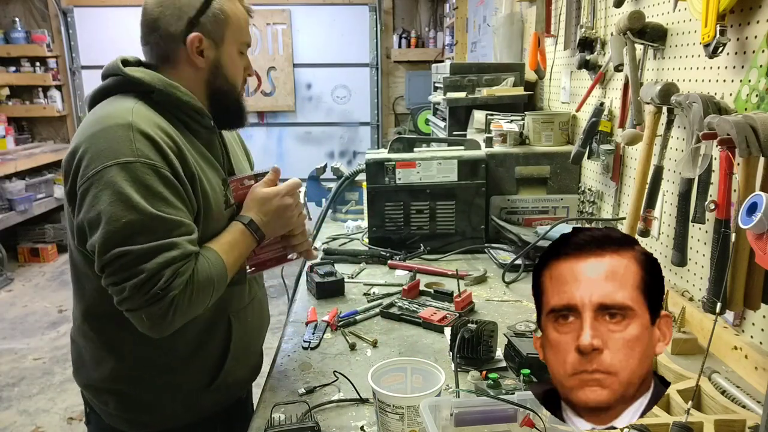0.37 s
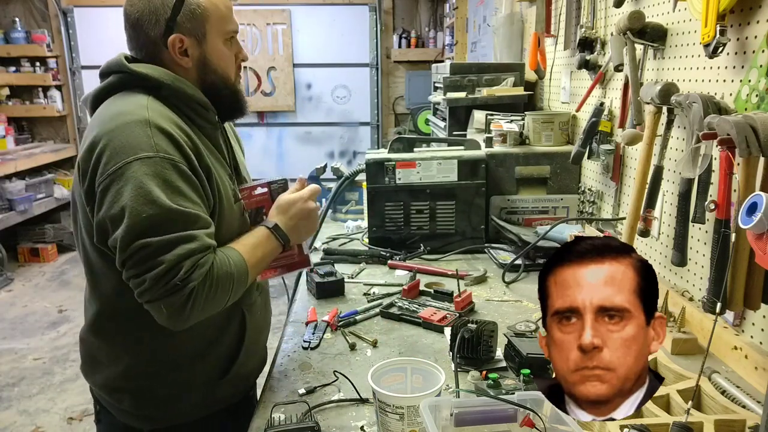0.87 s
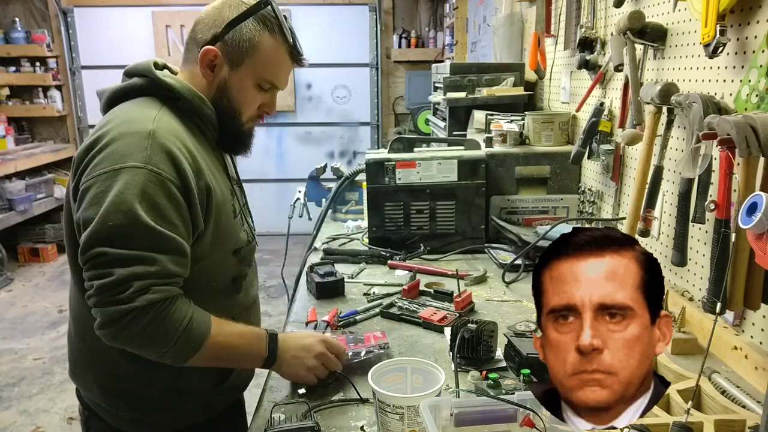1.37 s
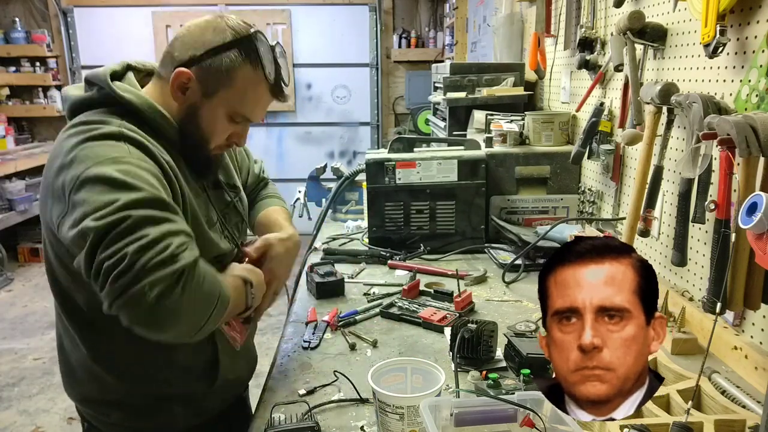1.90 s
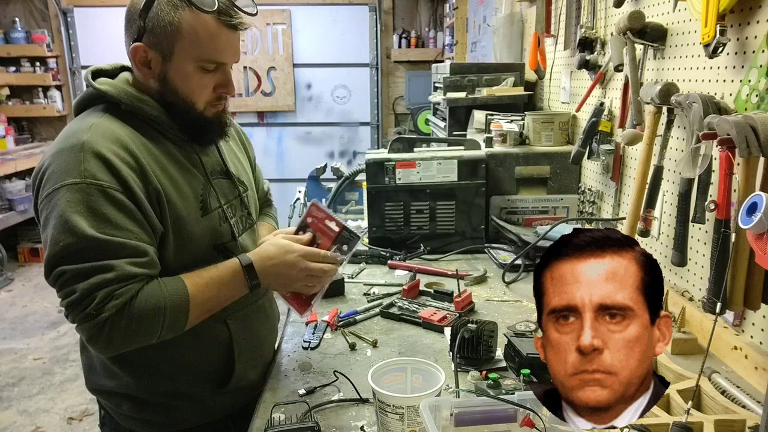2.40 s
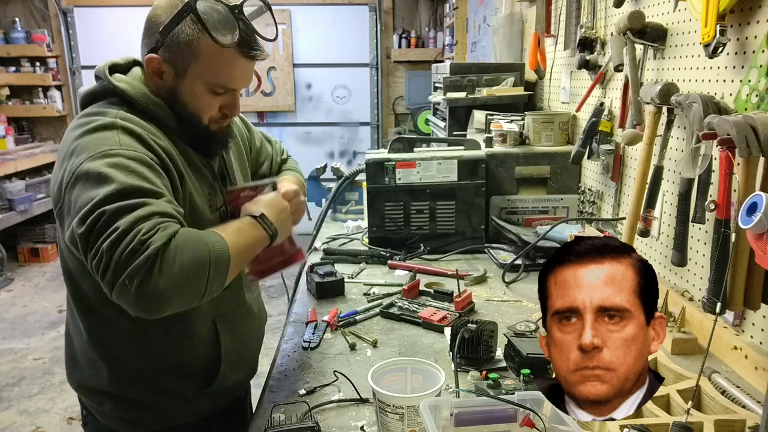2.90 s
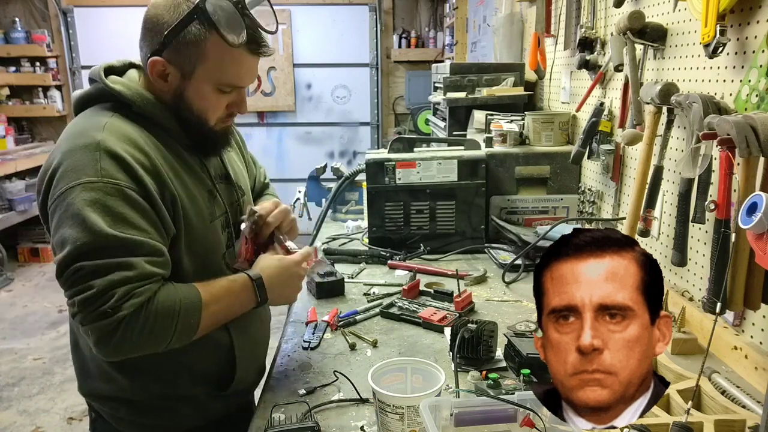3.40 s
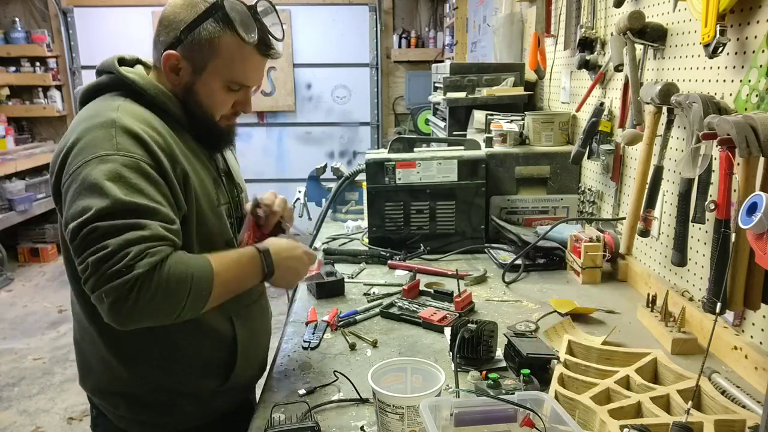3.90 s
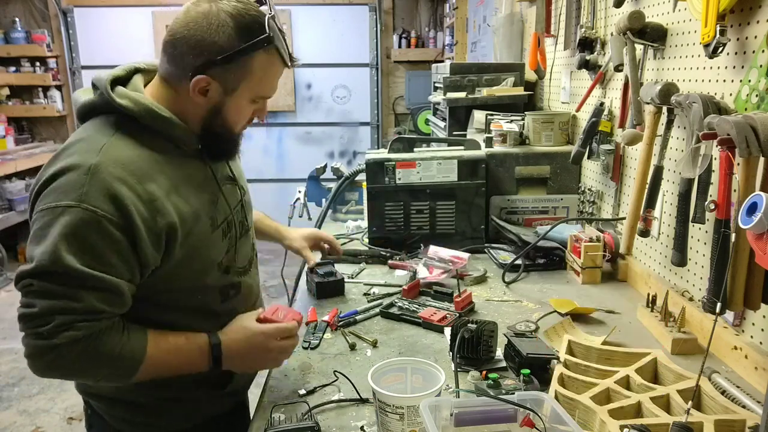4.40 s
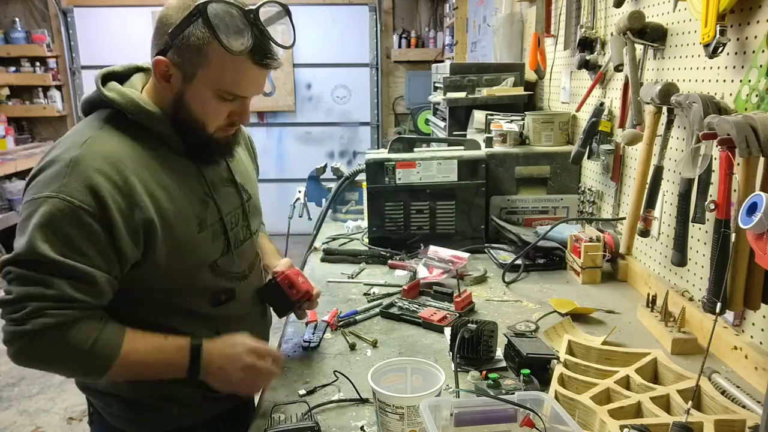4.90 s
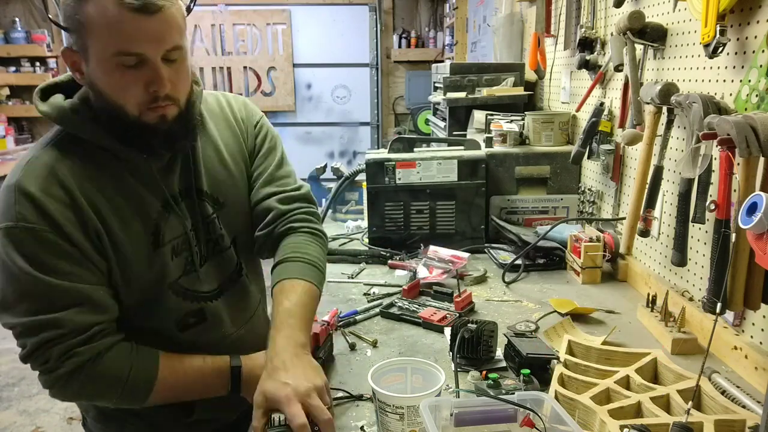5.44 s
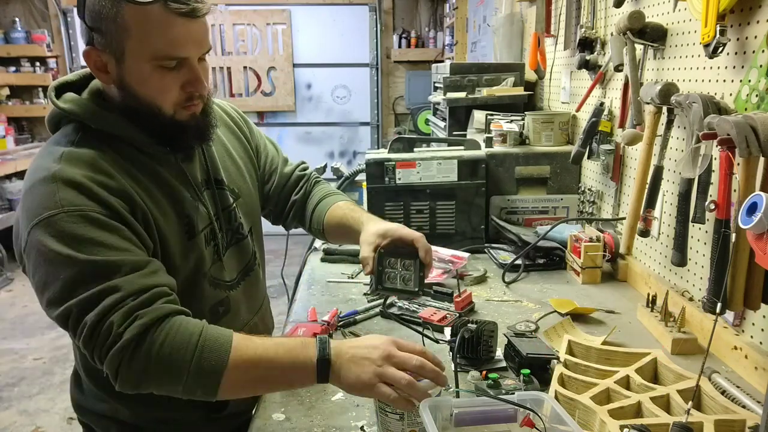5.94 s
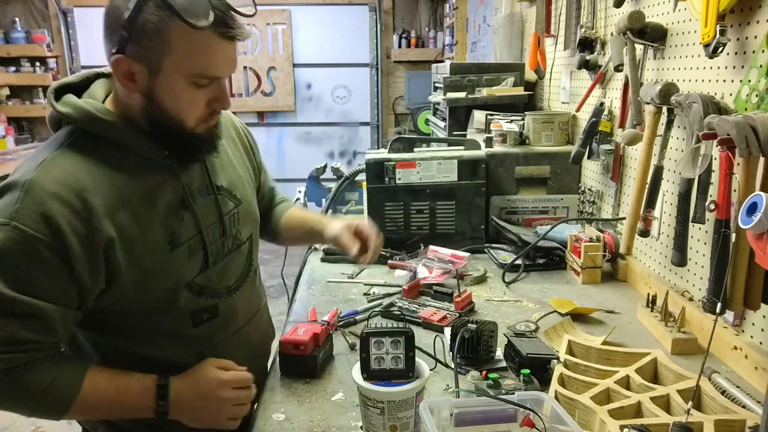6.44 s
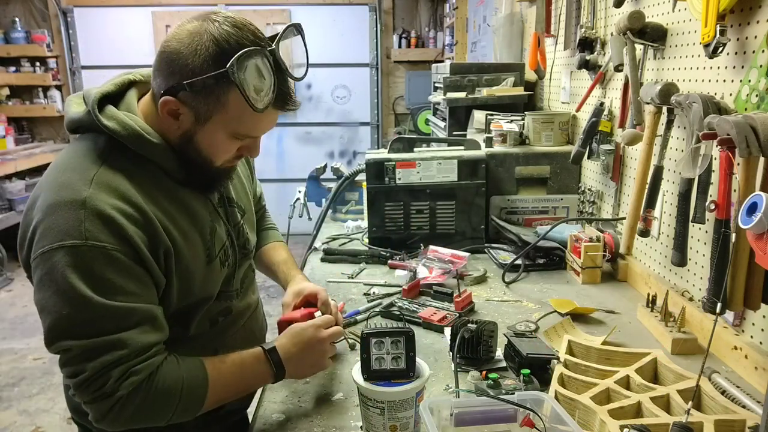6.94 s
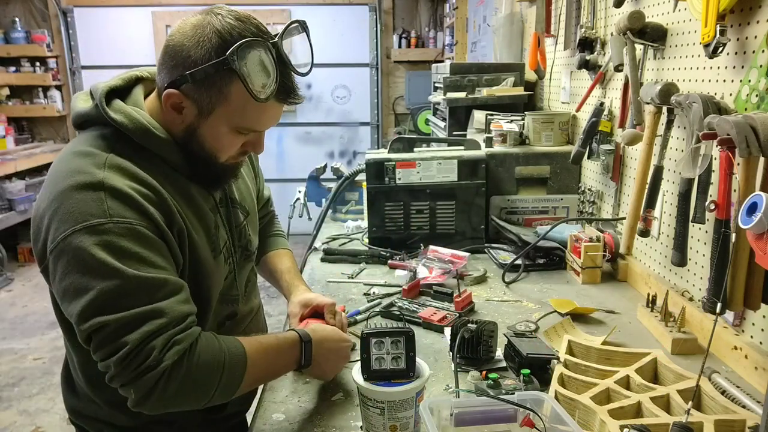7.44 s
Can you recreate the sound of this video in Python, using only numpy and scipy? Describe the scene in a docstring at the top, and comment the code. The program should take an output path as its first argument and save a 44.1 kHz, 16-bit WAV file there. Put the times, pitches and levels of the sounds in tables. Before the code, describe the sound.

A low soft blower rumble, gently fluttering, and faint hiss run throughout a workshop, picked up close by a phone in stereo. From 0 s stiff plastic rustles and ticks in hands, with a hard bright snap at about 0.55 s followed by a short drag. Light irregular crackling continues to 2 s. At 2.15 s a strong crack lands with a dull bench knock; more snaps follow around 2.7 s. Between 3.0 and 3.3 s the tearing peaks: dense hard cracks, hollow short rings, scraping and a knock. Crackle thins through 3.4-4.3 s with several bench taps and a scrape at 4.0. Quiet follows, then clicks at 4.8 and a sharp crack with knock at 4.9. Knocks come at 5.2; after a gap, taps and bright plastic scraping gather around 6.2. Only faint clicks and soft knocks remain near 6.7 and 7.1, ending in blower and hiss.

```python
"""Hands bend and tear a stiff plastic pack over a workbench near a two-port phone; blower and hiss run throughout.
From the start, buckles crack in short noise bursts that ring the pack, over a rustle of slips and brighter drags.
From 2 s, small parts also knock the bench, in decaying sines; cracks and short narrow-band rings crowd at about 3 s.
After 5 s quieter gaps alternate with knocks, and cracks and drags gather again at about 6.2 s.
Each near sound has a short dense noisy tail, cut off early, unlike at the two ports."""
import sys
import numpy as np
from scipy import signal
from scipy.fft import rfft, irfft, next_fast_len
from scipy.io import wavfile
from scipy.ndimage import uniform_filter1d

SR = 44100
rng = np.random.default_rng(int(sys.argv[2]) if len(sys.argv) > 2 else 0)


def unload_audio(sound):
    """Save the sound as a 16-bit wav file, at the path given as the first command line argument."""
    columns = np.transpose(np.atleast_2d(sound))
    # keep every value between -1 and 1, then stretch to whole-number steps
    steps = np.round(np.clip(columns, -1, 1) * 32767)
    wavfile.write(sys.argv[1], SR, steps.astype(np.int16))


def convert_level_to_amplitude(level_db):
    """Map a level in decibels to its linear amplitude factor."""
    exponent = np.asarray(level_db, float) / 20
    return 10 ** exponent


N = 333837
SHORT_SAMPLES = 2048  # length of one crack, noisy ring or knock

# clear cracks of pack and parts: (time [s], mid-band energy as rms over 1 ms [dB], crease ring [Hz],
# low tilt [dB], treble tilt [dB])
CRACKS = [(0.136, -53, 10900, 1, -1.5), (.193, -49, 2370, 4, -16), (0.3013, -36.5, 3760, 7.5, 0.5),
          (0.341, -46.5, 1230, 2, -12.5), (.4633, -46.5, 2450, 4, -6), (0.5198, -55, 9900, -5, -3),
          (0.5292, -51, 10900, -5, -1.5), (.551, -17, 4000, -8, -0.5), (0.608, -40.5, 2930, -12, -1),
          (0.6173, -42.5, 9150, 1, -6.5), (.7162, -48.5, 8800, -23, 1.5), (.777, -63, 10750, -7, 6),
          (0.8238, -42.5, 1765, 2.5, -3.5), (.836, -53, 9100, 4, -3), (0.8953, -46.5, 3770, 4, 5.5),
          (.938, -45.5, 1290, 11, -34), (0.9593, -50, 1370, 9, -18), (.986, -41, 6290, 0.5, -4),
          (1.022, -50, 4670, -19, 1), (1.0638, -58.5, 5020, -8, 8), (1.1, -56.5, 1700, 14, -17),
          (1.1761, -57.5, 1180, 5, -7), (1.259, -66, 8550, -11, 0), (1.281, -47, 8300, -3, 3.5),
          (1.312, -42.5, 4700, -2, 1), (1.5681, -37, 5450, 6, -3.5), (1.5947, -44.5, 1800, 5, -1.5),
          (1.682, -43.5, 5250, 2.5, 1), (1.8212, -45.5, 1380, 13, -10.5), (1.8499, -41, 2000, 8.5, -12.5),
          (1.936, -48, 9600, 3, 4), (1.997, -50.5, 4630, -20, -4), (2.0848, -41, 730, 6.5, -2),
          (2.0958, -56, 1330, 15, -7), (2.1466, -21.5, 3150, 1, -2.5), (2.1918, -41, 9800, 4.5, -1.5),
          (2.2724, -32, 10100, -3, 0), (2.3492, -40.5, 11200, 9.5, 2.5), (2.368, -35.5, 3580, -2.5, -5),
          (2.391, -50.5, 2390, 4, -6), (2.4006, -46.5, 5120, -5, -1), (2.4106, -49.5, 2450, -2, -4),
          (2.594, -46.5, 10160, -15, -2), (2.6113, -50.5, 9500, -12, 6), (2.6199, -51, 8400, -12, 4),
          (2.6524, -48.5, 6400, 3, 0), (2.662, -28, 4150, -3, -4.5), (2.689, -53, 5000, 0, 3),
          (2.7337, -32.5, 4000, -7, 7), (2.7658, -38.5, 4500, 7, -2), (2.77, -25, 4480, 4.5, -8.5),
          (2.8099, -57, 9370, -5, 4.5), (2.8225, -38.5, 5270, 4, -7.5), (2.8575, -46.5, 3580, 5, -6.5),
          (2.9477, -49, 8910, 5, 2.5), (2.999, -53, 5230, -1, -4.5), (3.014, -47, 4180, -2, -1),
          (3.0223, -45.5, 8850, 11, 3.5), (3.0366, -25.5, 3060, -4.5, 4), (3.0394, -23, 1356, -11, 4),
          (3.0511, -17.5, 1340, -21, 2.5), (3.0876, -35, 5600, 5, -4), (3.094, -19, 5400, -3.5, 2.5),
          (3.119, -32, 10440, -7, 5.5), (3.133, -34, 2690, -4, -4), (3.142, -44, 1380, 16, 0),
          (3.149, -39.5, 8460, 15, 6), (3.1575, -26, 1100, -3, -15.5), (3.1668, -15, 1350, .5, -2.5),
          (3.1733, -22, 3000, 7, -3), (3.1773, -16, 5390, 1.5, 1), (3.2148, -21.5, 6955, 2, 2.5),
          (3.2246, -39, 8760, -6, -0.5), (3.27, -32.5, 4510, 4.5, -3.5), (3.304, -45.5, 1335, 13, -7),
          (3.323, -36.5, 1270, 12, -12), (3.3311, -33.5, 1310, -14, -8.5), (3.342, -46, 1335, 13, -4),
          (3.3685, -38, 1356, 5, 2), (3.3869, -39, 7900, -2, 1), (3.4324, -31.5, 790, 4, -14.5),
          (3.4432, -34, 9800, -17, -4.5), (3.532, -47, 1485, -0.5, 2.5), (3.629, -52, 2300, 5, -9.5),
          (3.7761, -42, 5240, -28, -4.5), (3.794, -50.5, 8800, 1, -1), (3.822, -46.5, 742, 11, -0.5),
          (3.9174, -39, 4260, 5, -4), (3.954, -39, 1380, 10, -1), (3.9936, -39, 745, 9.5, -4),
          (4.0111, -24.5, 2320, 3.5, -1.5), (4.0802, -53.5, 1290, 10, -6), (4.087, -44, 1310, 16.5, 5),
          (4.0941, -47, 7950, 6, 2), (4.2071, -52, 1400, 4, -10), (4.2635, -43.5, 1420, 6, -1),
          (4.74, -60.5, 1370, 16, -8), (4.7697, -54, 1335, 9, -11), (4.8206, -35.5, 1350, -4, -4.5),
          (4.8289, -32, 2190, 0.5, -6.5), (4.9085, -16.5, 4170, -10, 3), (5.2057, -52.5, 748, 14, -4.5),
          (5.2323, -52.5, 5000, 3, -2), (5.239, -36.5, 2346, 5, -7.5), (5.8399, -45, 5350, 5.5, -4),
          (5.884, -59, 11100, -6, 11.5), (5.9112, -53.5, 8200, 5, 3), (6.0134, -44, 730, 8, -6.5),
          (6.051, -48, 760, 4, -4.5), (6.1176, -47.5, 4480, 3, -1.5), (6.1678, -45, 10100, 2, 11.5),
          (6.2002, -31.5, 10160, 4.5, -0.5), (6.235, -30, 4100, 11.5, 4), (6.264, -59.5, 9450, 17, 11),
          (6.303, -57, 750, 3, 7), (6.3518, -55, 9150, 12, 6), (6.672, -50, 2280, 5.5, -4),
          (6.7258, -54.5, 10800, 5, 3), (7.0602, -58.5, 1320, 15, -2), (7.0746, -59, 820, 19, 5),
          (7.1142, -62.5, 1390, 17, -9), (7.1225, -62.5, 753, 26, -10)]
# band in which crack energy is counted: (low edge [Hz], high edge [Hz])
CRACK_BAND_HZ = (1800, 5500)
# pack resonances: (centre [Hz], width [Hz], gain [dB])
PACK_MODES = [(1350, 280, 6), (2300, 500, -3), (5500, 600, -6)]
# time scale of a crack: longer when weaker than -10.5 dB, longer when ringing above 3 kHz
SNAP_MS, MS_PER_DB_WEAKER, MS_PER_OCTAVE = 1.9, .008, .25
# random faint crackle; its energy is relative to the handling level, every try sounds at BUSY_DB
CRACKLE_PER_S, CRACKLE_DB, CRACKLE_SPREAD_DB, BUSY_DB = 30, 9, 2.5, -66
CRACKLE_TILT_SPREAD_DB, CRACKLE_MS = 5, 3

# how hard the fingers work the plastic: (time [s], level [dB])
HANDLING = [(0, -72), (.45, -69.5), (.62, -74.5), (1.3, -67), (1.5, -77.5), (2.3, -72), (2.55, -74),
            (3.05, -66.5), (3.21, -57), (3.44, -63), (3.56, -71), (3.95, -78), (4.06, -65.5), (4.15, -73),
            (4.3, -67.5), (4.42, -92), (4.72, -87), (4.8, -76), (4.95, -87), (5.75, -97), (5.9, -79.5),
            (6.194, -67), (6.35, -65.5), (6.45, -89.5), (7.57, -91.5)]
# plastic dragged over an edge: (time [s], length [s], level before the envelope [dB])
DRAGS = [(0.597, 0.041, -53.5), (1.677, 0.034, -55), (1.926, 0.041, -55.5), (2.189, 0.035, -53.5),
         (2.586, 0.058, -61.5), (3.038, 0.024, -46), (3.1, 0.098, -54), (3.168, 0.064, -50),
         (3.262, 0.021, -55), (3.319, 0.035, -50.5), (4.006, 0.024, -42.5), (4.817, 0.024, -55),
         (5.88, 0.052, -60.5), (6.157, 0.048, -44.5), (6.202, 0.02, -47)]
# sliding plastic, relative spectrum: (frequency [Hz], density [dB per Hz])
FILM_SPECTRUM = [(240, -19), (400, 5), (628, 1), (3120, -6.5), (8060, -13), (10200, -14), (15500, -19.5),
                 (16500, -32.5)]

# short narrow-band noisy rings, mostly together with cracks:
# (time [s], rms before rise and decay [dB], centre [Hz], t60 [s])
NOISY_RINGS = [(.551, -21, 1434, .013), (.5512, -35, 2300, 0.011), (0.895, -40, 3780, 0.043),
               (3.039, -19, 1340, .025), (3.052, -24.5, 1370, 0.017), (3.094, -20.5, 5200, .027),
               (3.158, -28, 1000, .03), (3.167, -25.5, 1400, .02), (3.216, -32.5, 7100, .025),
               (3.325, -44, 1320, 0.091), (3.432, -37, 1436, .018), (3.821, -32, 710, 0.02),
               (4.829, -37, 2220, .03), (6.236, -38, 1450, .015), (7.072, -48.5, 790, 0.081)]
NOISY_RING_WIDTH_HZ, NOISY_RING_WIDENING = 210, .7  # per resonance at 1 kHz; power of growth with pitch

# dull knocks on the bench top: (time [s], peak [dB], ring [Hz])
KNOCKS = [(2.146, -32.5, 623), (3.155, -27, 690), (3.432, -29.5, 680), (3.821, -30.5, 640),
          (3.993, -28.5, 724), (4.908, -26, 682), (5.2051, -31, 392), (5.233, -31.5, 623), (5.24, -42, 200),
          (6.05, -41, 545), (6.064, -36.5, 620), (6.118, -47, 500), (6.2, -35.5, 540), (6.235, -31.5, 730),
          (6.305, -44.5, 320), (6.757, -45, 543), (7.078, -41.5, 377), (7.115, -47, 344), (7.122, -40, 354)]
# bench-top modes: (multiple of the ring [ratio], gain [dB], relative damping [ratio])
BENCH_MODES = [(.25, -9.5, 1.3), (.55, -7, 1.02), (1, 0.5, 0.99), (1.25, -10.5, 1.1), (1.7, -0.5, 3)]
KNOCK_T60_S, KNOCK_DAMPING = 0.015, 2  # at 600 Hz; power by which higher rings die sooner

# blower and hiss, relative spectrum: (frequency [Hz], density [dB per Hz])
SHOP_SPECTRUM = [(12, -43), (20, -14.5), (102, -8.5), (174, -2.5), (323, -8), (361, -10.5), (521, -8),
                 (616, -15), (670, -19), (1600, -23), (2010, -25), (3940, -31), (7200, -34.5),
                 (9000, -33.5), (10000, -34.5), (11100, -32.5), (12500, -36), (15200, -42), (16500, -44)]
SHOP_DB = -57.5  # rms

# likeness of the two ports, shop: (frequency [Hz], correlation [-1 to 1])
SHOP_ALIKE = [(60, .89), (130, .94), (290, .85), (640, .55), (1410, -.2), (3100, 0)]
# likeness of the two ports, near sounds: (frequency [Hz], correlation [-1 to 1])
NEAR_ALIKE = [(640, .85), (1410, .75), (3100, .7), (5000, .35), (7500, 0)]
# port response: (frequency [Hz], left minus right [dB])
PORT_DIFFERENCE = [(60, -1), (200, 0), (400, 2), (2400, .5), (4400, 3.5), (5600, 2.5), (8100, -7.5),
                   (15000, -10.5)]
PORT_LAG_S = 4.5e-5  # left port after right


def on_log(table, hz):
    """Read a (Hz, value) table along a log-frequency axis."""
    at_hz, value = np.transpose(table)
    return np.interp(np.log(hz + 1), np.log(at_hz + 1), value)


def level(x, db):
    """Scale to an rms level."""
    return x * convert_level_to_amplitude(db) / np.sqrt(np.mean(x ** 2) + 1e-30)


def axis_hz(count):
    """Frequencies of the real spectrum of count samples."""
    return np.arange(count // 2 + 1) * SR / count


def pair(count, alike):
    """Spectra of left and right noise, correlated by frequency as the table says."""
    hz = axis_hz(count)
    likeness = np.clip(on_log(alike, hz), -.99, .99)
    mid, side = rfft(rng.standard_normal((2, count)))
    shared = np.sqrt((1 + likeness) / 2) * mid
    opposed = np.sqrt((1 - likeness) / 2) * side * np.array([[1], [-1]])
    return shared + opposed, hz


def ring(hz, at_hz, width_hz):
    """Response of one resonance, gain 1 at its centre."""
    s = 1j * hz * width_hz
    return s / (at_hz ** 2 - hz ** 2 + s)


def even(spectrum, bins):
    """Remove the broad chance colour of a short noise."""
    return spectrum / np.sqrt(uniform_filter1d(np.abs(spectrum) ** 2, bins, axis=-1))


def walk(rate_hz):
    """Random levels held 1 / rate_hz s and smoothed twice; spread about 0.9."""
    hold = int(SR / rate_hz)
    steps = np.repeat(rng.standard_normal(N // hold + 1), hold)
    return 1.2 * uniform_filter1d(uniform_filter1d(steps, hold), hold)[:N]


def add(track, sound, time_s):
    """Lay a short sound on the track."""
    i = max(int(time_s * SR), 0)
    track[:, i:i + sound.shape[1]] += sound[:, :N - i]


def crack_ms(db, ring_hz):
    """Time scale of a clear crack: a hard snap is short, weak and high-ringing buckles run longer."""
    return SNAP_MS + MS_PER_DB_WEAKER * max(-10.5 - db, 0) + MS_PER_OCTAVE * np.log2(ring_hz / 3000)


def crackle():
    """Faint buckles at random: the harder the handling, the more and the louder."""
    tries = 240
    uniform, bell = rng.random((tries, 3)), rng.standard_normal((tries, 3))
    time_s = np.cumsum(-np.log(1 - uniform[:, 0])) / CRACKLE_PER_S
    work_db = np.interp(time_s, *np.transpose(HANDLING))
    energy_db = work_db + CRACKLE_DB + CRACKLE_SPREAD_DB * bell[:, 0]
    ring_hz = 900 * 12 ** uniform[:, 1]
    tilts_db = CRACKLE_TILT_SPREAD_DB * bell[:, 1:]
    sounds = (uniform[:, 2] < convert_level_to_amplitude(work_db - BUSY_DB)) & (time_s < N / SR)
    rows = np.column_stack([time_s, energy_db, ring_hz, tilts_db])
    return [(*row, CRACKLE_MS) for row in rows[sounds]]


def cracks():
    """A buckle runs along a crease for a few ms: a noisy burst that rings the pack and the crease itself."""
    out, hz = np.zeros((2, N)), axis_hz(SHORT_SAMPLES)
    lead_s = .003  # room for the filters to ring ahead
    t = np.maximum(np.arange(SHORT_SAMPLES) / SR - lead_s, 0)
    middle = (hz > CRACK_BAND_HZ[0]) & (hz < CRACK_BAND_HZ[1])
    pack = 1.35 + sum(convert_level_to_amplitude(g) * ring(hz, f, w) for f, w, g in PACK_MODES)
    clear = [(*row, crack_ms(row[1], row[2])) for row in CRACKS]
    for time_s, db, ring_hz, low_db, high_db, ms in clear + crackle():
        run = t / (max(ms, .3) / 1000)
        envelope = run ** 1.04 * np.exp(-(1.286 * run) ** 1.37)
        noise = irfft(pair(SHORT_SAMPLES, NEAR_ALIKE)[0])
        burst = even(rfft(noise * envelope), bins=40)
        # large folds push more low sound, tight ones more treble
        tilt = [(250, low_db - 25.5), (650, low_db - 1.5), (1400, low_db - 4.0), (2300, 1.0), (4800, 0.0077),
                (7000, high_db - 2.0), (11000, high_db - 4.0), (16000, high_db - 14.0)]
        crease = convert_level_to_amplitude(5) * ring(hz, ring_hz, .2 * ring_hz)
        body = burst * convert_level_to_amplitude(on_log(tilt, hz)) * (pack + crease)
        mean_energy = np.sum(np.abs(body[:, middle]) ** 2, axis=1).mean()
        power_1ms = 2 * mean_energy / SHORT_SAMPLES * 1000 / SR
        add(out, irfft(body) * convert_level_to_amplitude(db) / np.sqrt(power_1ms), time_s - .0007 - lead_s)
    return out


def rustle():
    """Dense tiny slips of uneven size over sliding noise, dull while the pack is held, brighter in each drag."""
    t = np.arange(N) / SR
    creep = convert_level_to_amplitude(np.interp(t, *np.transpose(HANDLING)))
    drag = np.zeros(N)
    for start, length, db in DRAGS:
        corners = [start, start + 0.002, start + 0.7 * length, start + length]
        drag += convert_level_to_amplitude(db) * np.interp(t, corners, [0, 0.89, 0.75, 0.0])
    slips = (rng.random(N) < 500 / SR) * convert_level_to_amplitude(1.1 * rng.exponential(size=N))  # 500 per s
    grain = .5 + signal.lfilter([1], [1, -np.exp(-1 / (0.0018 * SR))], slips)
    noise, hz = pair(next_fast_len(N), NEAR_ALIKE)
    noise = noise * convert_level_to_amplitude(on_log(FILM_SPECTRUM, hz))
    # a fast drag over a sharp edge lifts the treble
    edge = 1 + convert_level_to_amplitude(8) * ring(hz, 10000, 7000)
    dull = level(irfft(noise)[:, :N] * grain, 0)
    bright = level(irfft(noise * edge)[:, :N] * grain, 0)
    return dull * creep + bright * drag


def noisy_rings():
    """Many close modes heard as one narrow noise band that dies fast."""
    out, t = np.zeros((2, N)), np.arange(SHORT_SAMPLES) / SR
    for time_s, db, centre_hz, t60_s in NOISY_RINGS:
        noise, hz = pair(SHORT_SAMPLES, NEAR_ALIKE)
        width_hz = NOISY_RING_WIDTH_HZ * (centre_hz / 1000) ** NOISY_RING_WIDENING
        band = level(irfft(noise * ring(hz, centre_hz, width_hz) ** 2), db)
        rise = np.minimum(t / 0.00092, 1)
        add(out, band * rise * np.exp(-np.log(1000) * t / t60_s), time_s)
    return out


def knocks():
    """A soft blow sets a short bench-top mode and its neighbours ringing as decaying sines."""
    out, t = np.zeros((2, N)), np.arange(SHORT_SAMPLES) / SR
    for time_s, db, hz in KNOCKS:
        phases = 2 * np.pi * rng.random(len(BENCH_MODES))
        fade = np.log(1000) * t / (KNOCK_T60_S * (600 / hz) ** KNOCK_DAMPING)
        sound = np.zeros(SHORT_SAMPLES)
        for (multiple, gain_db, damping), phase in zip(BENCH_MODES, phases):
            sound += convert_level_to_amplitude(gain_db) * np.sin(2 * np.pi * multiple * hz * t + phase) * np.exp(-damping * fade)
        sound = sound * np.minimum(t / 0.0014, 1)
        add(out, np.array([sound, sound]) * convert_level_to_amplitude(db) / np.abs(sound).max(), time_s - .0006)
    return out


def with_tails(x):
    """Give each sound a short dense noisy tail, cut off early, unlike at the two ports."""
    t = np.arange(4096) / SR
    envelope = np.minimum(t / 0.0033, 1) * np.exp(-t / 0.0079 - (t / 0.046) ** 3)
    tail = rng.standard_normal((2, len(t))) * envelope
    # the tail is thin in the bass and in the top octave
    tail = irfft(even(rfft(tail), bins=40) * ring(axis_hz(len(t)), 6000, 9000))
    tail = convert_level_to_amplitude(-10.5) * tail / np.sqrt(np.sum(tail ** 2, axis=1, keepdims=True))
    return x + signal.fftconvolve(x, tail, axes=1)[:, :N]


def shop():
    """Blower rumble that swells slowly and flickers, over microphone hiss that drifts a little."""
    noise, hz = pair(next_fast_len(N), SHOP_ALIKE)
    noise = noise * convert_level_to_amplitude(on_log(SHOP_SPECTRUM, hz))
    low = 1 / (1 + (hz / 800) ** 4)
    rumble = irfft(noise * low)[:, :N] * convert_level_to_amplitude(0.27 * walk(1.2) + 0.7 * walk(12))
    hiss = irfft(noise * (1 - low))[:, :N] * convert_level_to_amplitude(.3 * walk(1))
    return level(rumble + hiss, SHOP_DB)


def scene():
    """Handling and parts with their tails, over the shop."""
    return with_tails(cracks() + rustle() + noisy_rings() + knocks()) + shop()


def low_pass(x):
    """Removes everything above the highest recorded frequency."""
    return signal.sosfilt(signal.butter(12, 16810, fs=SR, output="sos"), x)


def record(dry):
    """Two unlike ports: the left one faces away, loses high treble and hears a little late."""
    count = next_fast_len(N)
    hz = axis_hz(count)
    half_db = on_log(PORT_DIFFERENCE, hz) / 2
    late = np.exp(-2j * np.pi * hz * np.array([[PORT_LAG_S], [0]]))
    ports = irfft(rfft(dry, count) * convert_level_to_amplitude(np.array([half_db, -half_db])) * late, count)[:, :N]
    return low_pass(ports)


dry = scene()
out = record(dry)
unload_audio(out)
```